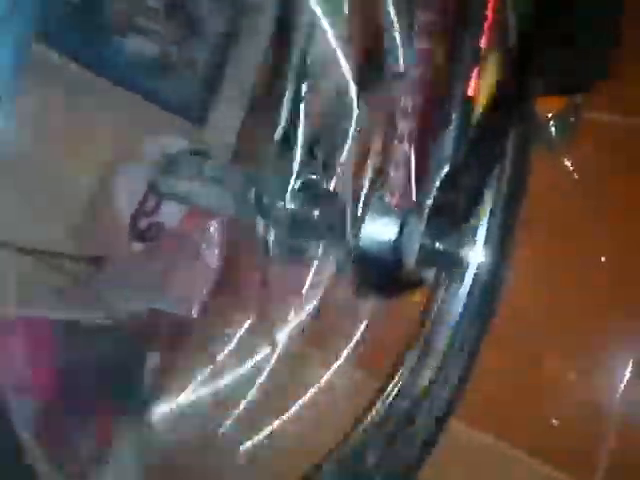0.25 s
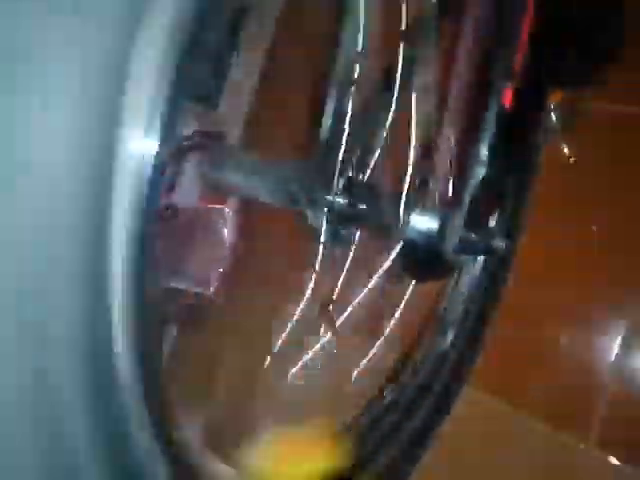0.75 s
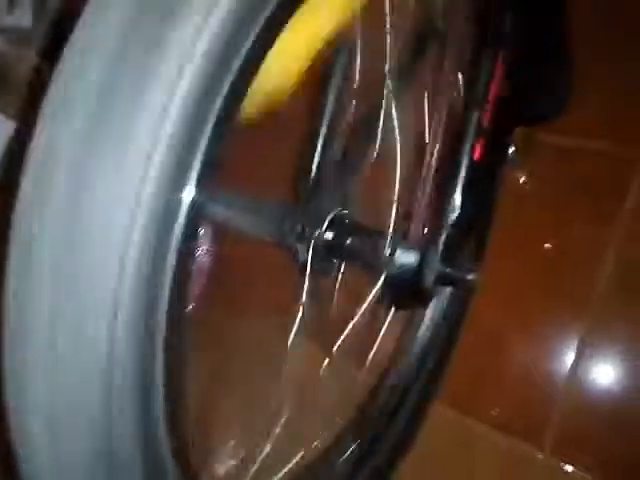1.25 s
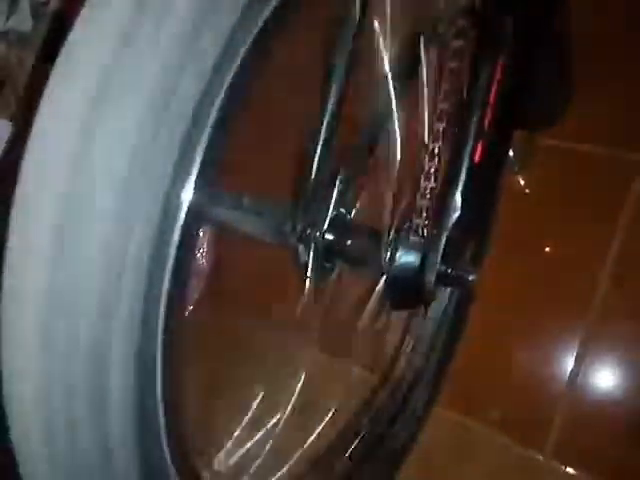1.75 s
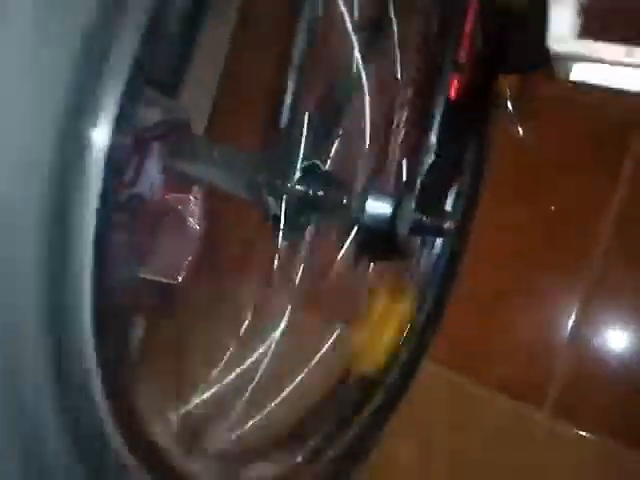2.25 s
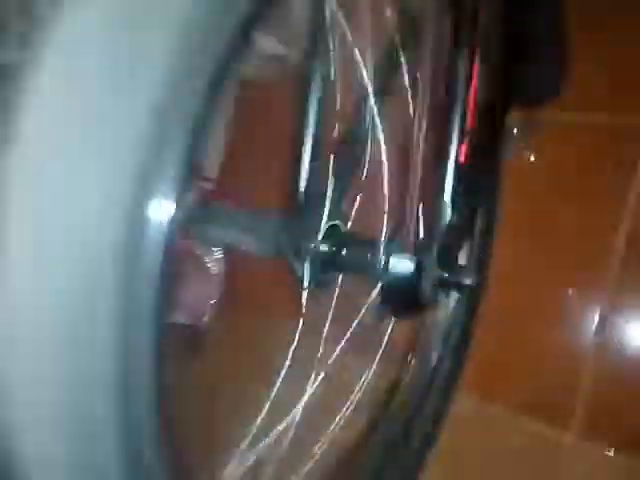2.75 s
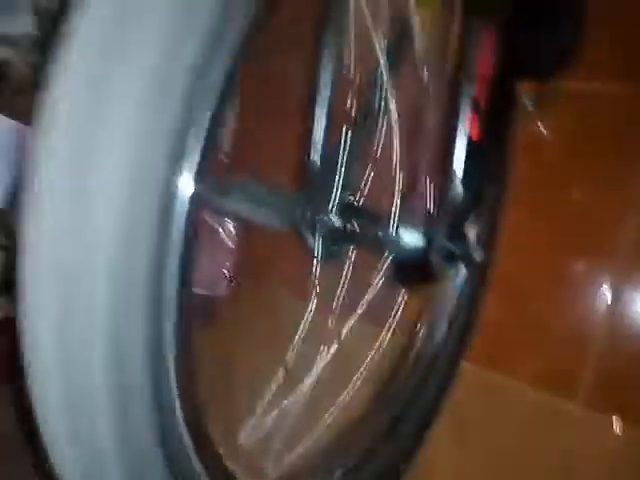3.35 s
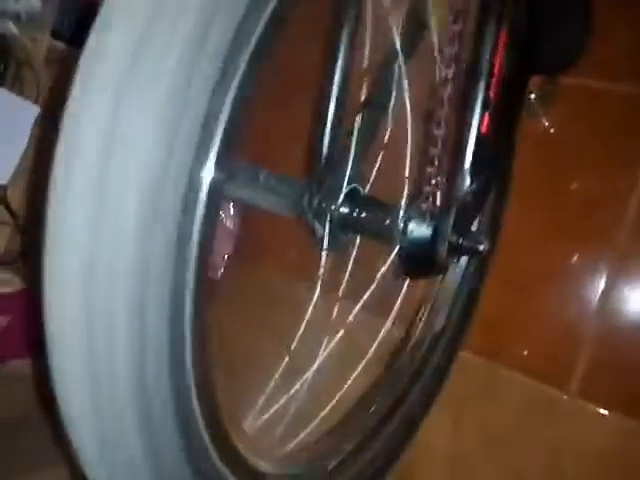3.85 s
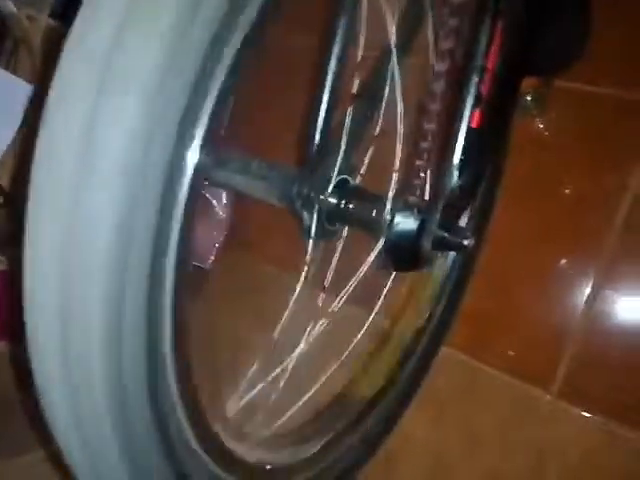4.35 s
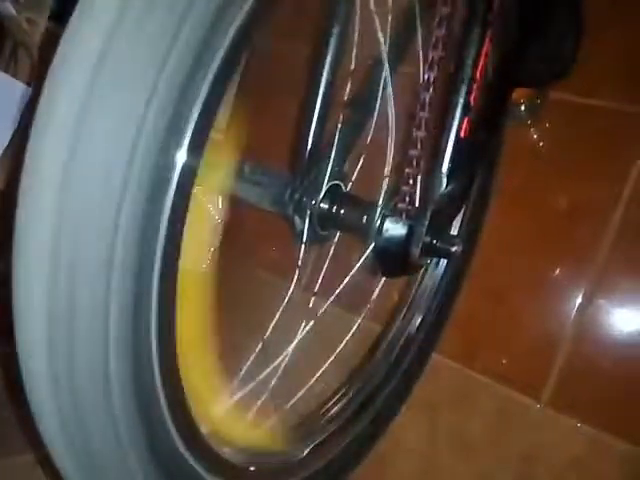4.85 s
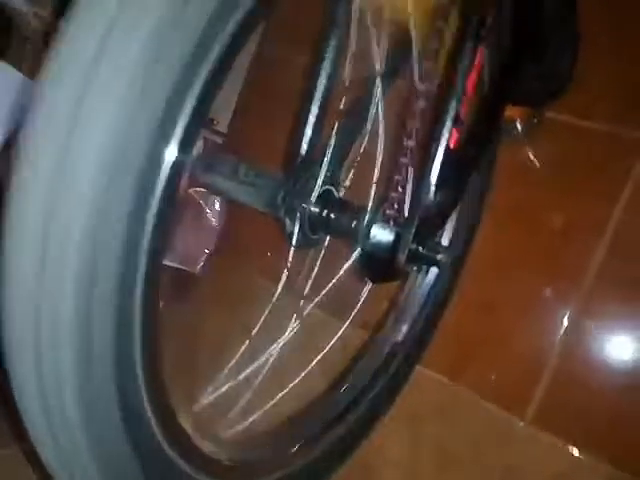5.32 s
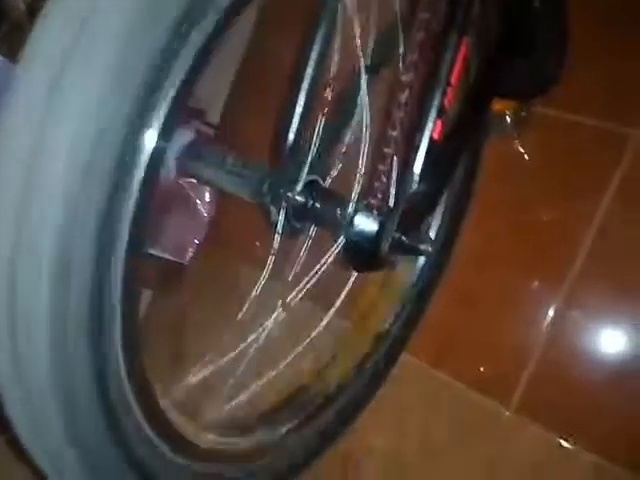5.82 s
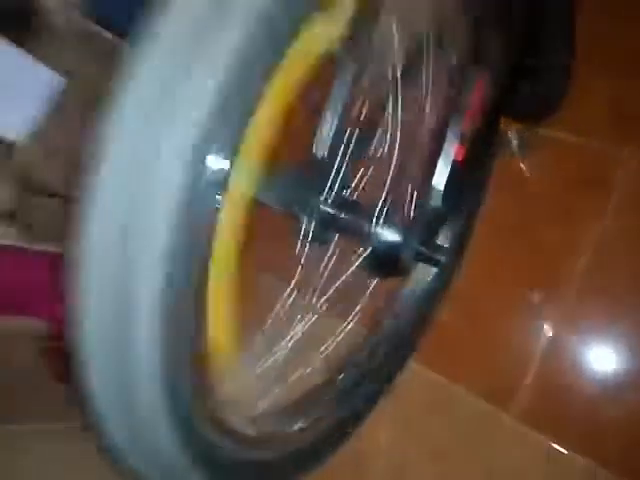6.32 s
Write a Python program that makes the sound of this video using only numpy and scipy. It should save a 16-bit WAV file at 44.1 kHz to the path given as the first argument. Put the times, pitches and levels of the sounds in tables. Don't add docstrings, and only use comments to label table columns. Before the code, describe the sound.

A bicycle rear hub rattles, ticks and clunks in a tiled room, then buzzes like a cricket for nearly three seconds and slows.

```python
import sys
import numpy as np
from scipy import signal
from scipy.fft import rfft, irfft, next_fast_len
from scipy.io import wavfile
from scipy.ndimage import uniform_filter1d, map_coordinates

SR = 44100
rng = np.random.default_rng(int(sys.argv[2]) if len(sys.argv) > 2 else 0)


def invert_db(level):
    return 10 ** (np.asarray(level, dtype=float) / 20)


def digitize_waveform(pressure):
    field = np.atleast_2d(pressure).T
    bounded = np.clip(field, -1, 1)
    quanta = np.round(bounded * 32767).astype(np.int16)
    wavfile.write(sys.argv[1], SR, quanta)


N = 290178

# [t/s, tooth rate/(1/s)]
COASTING_RUNS = [
    [(0.001, 54.8), (0.15, 55.2), (0.3, 49.3), (0.39, 41.9), (0.48, 23.8)],
    [(1.498, 38.3), (1.58, 46.8), (1.66, 67.5), (1.75, 68.4), (1.9, 66.7), (1.97, 58.5), (2.07, 30.6)],
    [(3.421, 37.6), (3.46, 87.7), (3.5, 122.7), (3.556, 148.5), (3.63, 180), (4.1, 174.5), (5, 167.5),
     (5.9, 161.5), (6.036, 158)],
    [(6.039, 158), (6.126, 134.6), (6.2, 111.1), (6.27, 81.2), (6.33, 57.6), (6.385, 30.0)],
]
# [landing level/dB, cog ring re landing/dB, push into the spokes re landing/dB]
RUN_LEVELS = [(-21, -8, -5.5), (-22.5, -5, -5), (-21.5, -5.5, -5.5), (-21.5, -7.5, -6.5)]
TURN_DIP_DB = [5, 3, 20, 2]
# [t/s, peak level/dB]
SINGLE_CLICKS = [
    (0.5186, -15.5),
    (0.5698, -16),
    (1.456, -17.5),
    (2.123, -17),
    (3.3992, -14),
]
# [f/Hz, width/Hz, level/dB]
HUB_MODES = [(1550, 224, -13.5), (2010, 480, -7.5), (2313, 316, 3), (2850, 270, -8), (3780, 200, -6.5),
             (5705, 720, -4.5), (6200, 530, -5), (6630, 450, -8.5), (7090, 550, -6), (6900, 240, -8),
             (11000, 120, -40), (11520, 270, -9.5), (12800, 1070, -9.5), (12580, 590, -5)]
# [f/Hz, level per Hz/dB]
SHELL_SPECTRUM = [(480, -48), (630, -28.5), (1350, -21), (1600, -15.5), (3300, -7), (5010, -11),
                  (7500, -11), (9130, -21), (10800, -12.5), (13300, -29), (13600, -44), (15600, -14)]
# [f/Hz, width/Hz, level/dB]
COG_MODES = [(4070, 170, 0), (4260, 130, 0.5), (4326, 310, 4)]
# [f/Hz, level per Hz/dB]
SPOKE_SPECTRUM = [(500, -50), (620, -20), (690, 0), (830, -2), (1000, -4), (1250, -12), (1500, -30),
                  (2500, -60)]


def freehub():
    teeth_per_turn, facing_tooth = 48, 22
    settle_teeth = 170
    softer_db = 0.9
    clicks = []
    for run, (land_db, ring_db, drive_db), dip_db in zip(COASTING_RUNS, RUN_LEVELS, TURN_DIP_DB):
        t = np.arange(run[0][0], run[-1][0], 1 / SR)
        teeth = np.cumsum(along(run, t, log=False)) / SR
        k = np.arange(int(teeth[-1]) + 1)
        at = np.interp(k, teeth, t)
        facing = np.cos(np.pi * (k - facing_tooth) / teeth_per_turn) ** 4
        turn_db = dip_db * np.exp(-k / settle_teeth) * (facing - 1)
        landing_db = land_db - softer_db * along(run, at, log=False) / 100
        clicks += zip(at, landing_db, ring_db + 0 * at, drive_db + turn_db)
    clicks += [(at, peak_db - 7.5, -5, -7.5) for at, peak_db in SINGLE_CLICKS]
    s, db, ring_db, drive_db = np.transpose(clicks)

    chance = rng.standard_normal((len(s), 3))
    hit_s = abs(s + 0.0004 * chance[:, 0])
    hit_db = db + 1.2 * chance[:, 1]
    burst = chatter(hit_s, hit_db, rise=0.00027, hold=0.004, t60=0.05, spiky_db=2.5)
    shell = filtered(burst, lambda hz: np.hypot(modes(HUB_MODES)(hz), colour(SHELL_SPECTRUM)(hz)))
    ringing = chatter(hit_s, hit_db + ring_db, rise=0.0022, hold=0.0046, t60=0.036, spiky_db=1)
    cog = filtered(ringing, modes(COG_MODES))

    alternate_db = 8 * (-1) ** np.arange(len(s))
    push_db = db + drive_db + alternate_db + 2.5 * chance[:, 2]
    push_s = s + 0.3 * (hit_s - s)
    push = np.bincount(np.round(push_s * SR).astype(int), invert_db(push_db), N)[:N]
    return shell + cog + filtered(push, colour(SPOKE_SPECTRUM))


# [t/s, level/dB]
CRANK_EFFORT = [(.93, -37), (1.05, -33.5), (1.26, -32), (1.4, -38.5), (2.5, -37.5), (2.575, -33),
                (2.615, -23.5), (2.77, -27), (2.85, -31), (2.95, -32), (3.01, -21.5)]
# [first t/s, last t/s, count, bright level/dB, 2 kHz body level/dB]
LINK_TRAINS = [
    (.9702, 1.401, 7, -0.6, -11),
    (0.931, 1.158, 4, -14, -3.5),
    (2.497, 2.762, 8, 1, -10),
    (2.556, 2.75, 6, -3.5, -7.5),
    (2.851, 2.9754, 3, -4, 0),
    (2.884, 3.008, 3, -3.5, -10),
]
# [t/s, bright peak level/dB, body re bright/dB]
STRAY_TICKS = [(0.7152, -31.5, -10.5), (0.7726, -37.5, -6), (.802, -31.5, -6), (2.171, -43, 5),
               (2.254, -42, 5.5), (2.4426, -30.5, -19), (2.5157, -33.5, 4.5), (2.9906, -27, -16),
               (3.0314, -30, -14), (3.065, -33, 2), (3.0776, -25.5, -3), (3.1204, -36, 1.5),
               (3.204, -22, -5.5), (3.257, -23, -4), (3.2684, -23, -1), (3.2957, -19.5, -7),
               (6.4577, -22.5, -6.5), (6.484, -21.5, -7), (6.506, -29.5, 6)]
# [t/s, peak level/dB]
PAWL_SLIPS = [(1.2394, -48), (2.784, -31), (3.3206, -18.5), (3.3415, -21.5), (3.351, -22), (3.3803, -21),
              (6.4076, -32), (6.4373, -22.5), (6.4694, -24), (6.553, -25.5)]


def ticks():
    train_top_db, stray_top_db, slip_top_db = -21, -19.5, -10
    slip_body_db, scatter_db = -11.5, 1.5
    rows = [(s, db, db + body_db, db + stray_top_db) for s, db, body_db in STRAY_TICKS]
    rows += [(s, db, db + slip_body_db, db + slip_top_db) for s, db in PAWL_SLIPS]
    for first, last, count, bright_db, body_db in LINK_TRAINS:
        s = np.linspace(first, last, round(count))
        db = along(CRANK_EFFORT, s, log=False) + scatter_db * rng.standard_normal((3, len(s)))
        top_db = db[2] + train_top_db + bright_db / 2
        rows += zip(s, db[0] + bright_db, db[1] + body_db, top_db)
    return np.transpose(rows)


# [f/Hz, level per Hz/dB]
ROLLER_SPECTRUM = [(2500, -24), (3600, -5), (4260, 6), (4800, -2.5), (5600, 4), (6300, 0.5), (7900, -6),
                   (8300, -13.5), (10000, -16.5), (12000, -24)]
# [f/Hz, level per Hz/dB]
LINK_SPECTRUM = [(900, -65), (1400, -6.5), (2100, 6.5), (2600, -1), (3300, -4.5), (4200, -67)]
# [f/Hz, level per Hz/dB]
SHEEN_SPECTRUM = [(8500, -11), (10300, -13), (12700, 2), (13600, -10), (15500, -24), (16500, -38)]
# [t/s, level/dB, hold/s]
CHAIN_GRINDS = [
    (2.6, -62, .25),
    (2.9, -60.5, 0.22),
]


def chain():
    s, db, body_db, top_db = ticks()
    roller = chatter(s, db - 6, rise=0.0001, hold=0.002, t60=0.045, spiky_db=2.5)
    link = chatter(s, body_db - 5, rise=0.0005, hold=0.006, t60=0.045, spiky_db=2.5)
    sheen = chatter(s, top_db - 2.5, rise=0.0002, hold=0.0014, t60=0.034, spiky_db=8)
    grind = swells(CHAIN_GRINDS, rise=150, fall=120) * rng.standard_normal(N) * invert_db(3.8 * wobble(60))
    tick_sound = filtered(roller, colour(ROLLER_SPECTRUM)) + filtered(link, colour(LINK_SPECTRUM))
    return tick_sound + filtered(sheen, colour(SHEEN_SPECTRUM)) + filtered(grind, colour(SHEEN_SPECTRUM))


# [t/s, peak level/dB, low knock re peak/dB]
HUB_CLUNKS = [
    (2.37, -18, -18.5),
    (2.3738, -16, -33),
    (2.378, -20, -13),
    (2.606, -29, 4.5),
    (2.9664, -38, 4.5),
    (3.232, -16.5, -19),
    (3.2359, -16.5, -12.5),
    (3.241, -22, -23),
]
# [f/Hz, width/Hz, level/dB]
FRAME_MODES = [(1040, 340, -6), (1360, 340, -13.5), (1976, 200, -1), (2250, 230, -4.5), (2460, 300, -4),
               (2790, 370, -8), (3560, 770, -21), (4300, 210, -17), (4630, 310, -14.5), (5650, 1150, -19.5),
               (7200, 1600, -44), (10130, 280, -15), (11300, 500, -17.5), (12700, 1600, -29)]
# [f/Hz, width/Hz, level/dB]
TUBE_MODES = [(312, 130, -12), (484, 510, 0.5), (700, 100, 3.5)]


def clunks():
    s, db, low_db = np.transpose(HUB_CLUNKS)
    ring = chatter(s, db + 1.5, rise=0.0001, hold=0.00052, t60=0.018, spiky_db=3)
    thump = chatter(s, db + low_db + 3, rise=0.00023, hold=0.00057, t60=0.016, spiky_db=3)
    return filtered(ring, modes(FRAME_MODES)) + filtered(thump, modes(TUBE_MODES))


# [t/s, level/dB, hold/s]
FRAME_JOLTS = [(.52, -61, .04), (.89, -53.5, 0.017), (1.19, -67, 0.026), (1.42, -54, .03),
               (2.15, -59, 0.13), (2.38, -48.5, 0.011), (2.55, -57, 0.028), (2.72, -50.5, 0.19),
               (2.93, -45, 0.034), (3.09, -45, 0.036), (3.24, -45.5, 0.091), (3.4, -53, 0.25),
               (4.92, -56, 0.033), (5.47, -53, 0.012), (5.76, -55, 0.037), (6.01, -50, 0.028),
               (6.35, -49, 0.21)]
# [f/Hz, level per Hz/dB]
RUMBLE_SPECTRUM = [(60, -60), (150, -34), (230, -5), (290, 5), (370, -10), (520, -26), (700, -30),
                   (1500, -80)]
# [t/s, level/dB, hold/s]
HAND_FOOT_SCUFFS = [(0, -52, 0.13), (.85, -47.5, 0.017), (1.2, -57.5, 0.0082), (2.1, -49.5, 0.16),
                    (2.3, -52.5, 0.46), (2.82, -46, 0.29), (2.99, -44, 0.022), (3.1, -49.5, 0.16),
                    (5.47, -54, .03), (5.53, -33.5, 0.11), (5.87, -41, 0.057), (6.05, -48.5, 0.6)]
# [f/Hz, level per Hz/dB]
RUB_SPECTRUM = [(200, -67), (450, -17.5), (700, -4.5), (1100, 0), (1700, -1.5), (2600, -9.5), (4000, -26),
                (8000, -65), (16000, -90)]


def handling():
    t = np.arange(N) / SR
    rates = [np.interp(t, *np.transpose(run), left=0, right=0) for run in COASTING_RUNS]
    speed = sum(rates) / np.max(COASTING_RUNS[2])
    hum = invert_db(-76) + speed ** 2 * invert_db(-59.5 + 0.5 * wobble(4.2))
    drone = unit(filtered(rng.standard_normal(N), colour(RUMBLE_SPECTRUM)) * invert_db(1.5 * wobble(14)))
    rumble = invert_db(-4) * np.hypot(hum, swells(FRAME_JOLTS, rise=270, fall=210)) * drone
    rub = unit(filtered(rng.standard_normal(N), colour(RUB_SPECTRUM)) * invert_db(1.5 * wobble(45)))
    return rumble + swells(HAND_FOOT_SCUFFS, rise=360, fall=205) * rub


# [f/Hz, t60/s]
ROOM_DECAY = [(400, 0.5), (1500, 0.37), (6000, 0.37), (14000, 0.24)]


def room(x, paths=3):
    hz, t, z = signal.stft(rng.standard_normal((paths, SR // 2)), SR, nperseg=256)
    decay = invert_db(-60 * t / along(ROOM_DECAY, hz)[:, None])
    tails = signal.istft(z * decay, SR, nperseg=256)[1]
    tails = tails / np.linalg.norm(tails[0])
    shares = np.array([wobble(7) for _ in range(paths)])
    shares = shares / np.linalg.norm(shares, axis=0)
    delayed = np.pad(x * shares, ((0, 0), (round(0.008 * SR), 0)))
    return signal.fftconvolve(delayed, tails, axes=1).sum(0)[:N]


# [f/Hz, level per Hz/dB]
AIR_SPECTRUM = [(25, -23), (55, -7.5), (150, -11.5), (289, -8), (482, -15), (684, -0.5), (1170, -11),
                (1950, 4), (4380, -7), (7500, -10), (9000, -47), (13000, -52), (14500, -75)]


def still_air():
    return invert_db(-55) * filtered(rng.standard_normal(N), colour(AIR_SPECTRUM))


def chatter(s, db, rise, hold, t60, spiky_db):
    power = np.bincount(np.round(np.asarray(s) * SR).astype(int), invert_db(db) ** 2, N)[:N]
    t = np.arange(SR // 10) / SR
    shape = (invert_db(-60 * np.clip(t - hold, 0, None) / t60) * (1 - np.exp(-t / rise))) ** 2
    spikes = invert_db(np.clip(spiky_db, 0, 5) * rng.standard_normal(N))
    grit = unit(rng.standard_normal(N) * spikes)
    return grit * np.sqrt(abs(signal.fftconvolve(power, shape / shape.max())[:N]))


def swells(rows, rise, fall):
    t = np.arange(N) / SR
    power = 0
    for s, db, hold in rows:
        before, after = np.clip(s - t, 0, 1), np.clip(t - s - hold, 0, 1)
        power = power + invert_db(db - rise * before - fall * after) ** 2
    return np.sqrt(power)


def wobble(rate):
    knots = rng.standard_normal(int(N * rate / SR) + 4)
    return map_coordinates(knots, [np.arange(N) * rate / SR])


def unit(x):
    return x / np.sqrt(np.mean(x ** 2) + 1e-20)


def along(points, at, log=True):
    p, v = np.transpose(points)
    if log:
        return np.interp(np.log(at + 1), np.log(p + 1), v)
    return np.interp(at, p, v)


def colour(points):
    return lambda hz: invert_db(along(points, hz))


def modes(table, skirt=2):
    def gain(f):
        power = 0
        for centre, width, db in table:
            detune = (centre * centre - f * f) / (f * width + 1)
            power = power + invert_db(db) ** 2 / (1 + detune ** 2) ** skirt
        return np.sqrt(power)
    return gain


def filtered(x, gain_at):
    m = 2 * next_fast_len(N // 2 + SR // 4)
    gain = gain_at(np.fft.rfftfreq(m, 1 / SR))
    cepstrum = irfft(np.log(gain / np.sqrt(np.mean(gain ** 2)) + 1e-6), m)
    cepstrum[1:m // 2] *= 2
    cepstrum[m // 2 + 1:] = 0
    return irfft(rfft(x, m) * np.exp(rfft(cepstrum)), m)[:N]


def scene():
    wheel = freehub() + chain()
    blows = invert_db(1.5) * clunks()
    echo = invert_db(-3.5) * room(wheel + invert_db(-4) * blows)
    return (wheel + blows + echo + handling() + still_air())[None]


def top_cut(x):
    return signal.sosfilt(signal.butter(12, 16510, fs=SR, output="sos"), x)


def record(dry):
    loudness = np.sqrt(abs(uniform_filter1d(dry ** 2, 2000, axis=1)))
    shake = filtered(rng.standard_normal(N), modes([(49.7, 13, -2), (87.6, 65, -14)]))
    flutter = invert_db(-49) * loudness * shake
    band = np.clip((15600 - np.fft.rfftfreq(N, 1 / SR)) / 90, 0, 1) ** 2
    kept = irfft(rfft(dry + flutter) * band, N)
    return top_cut(kept)


dry = scene()
out = record(dry)
digitize_waveform(out)
```